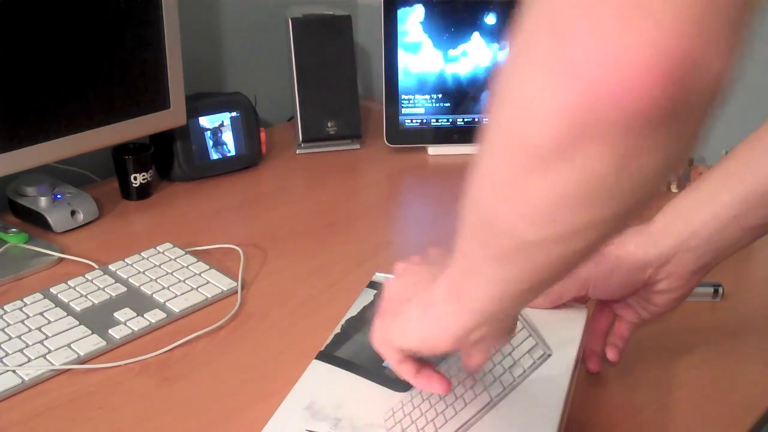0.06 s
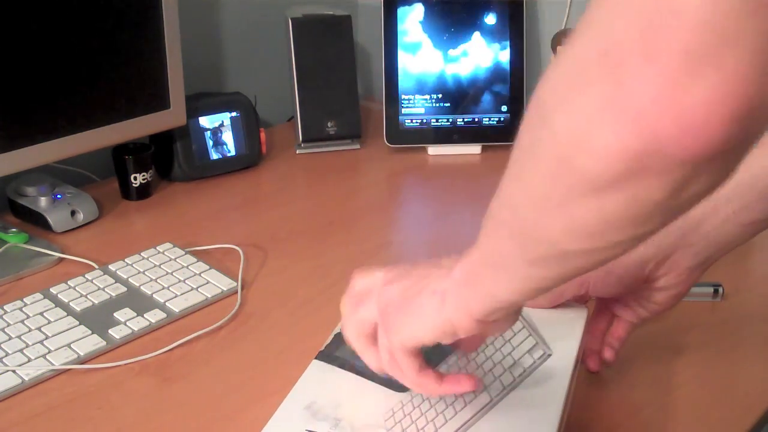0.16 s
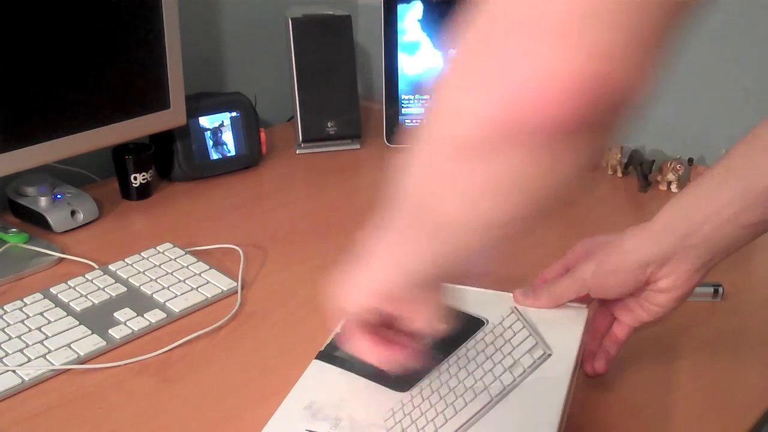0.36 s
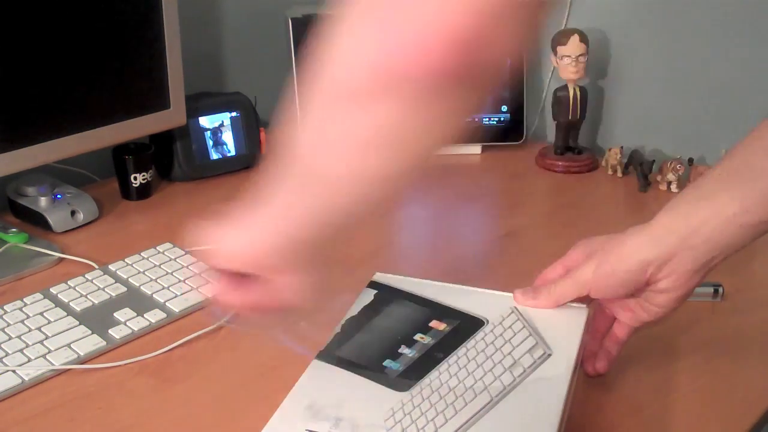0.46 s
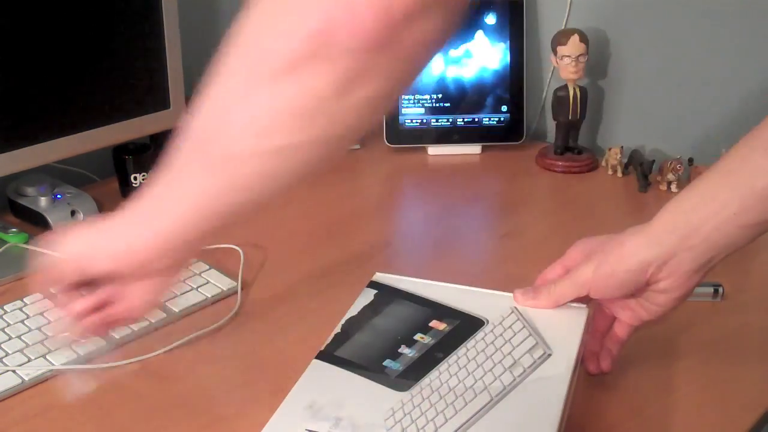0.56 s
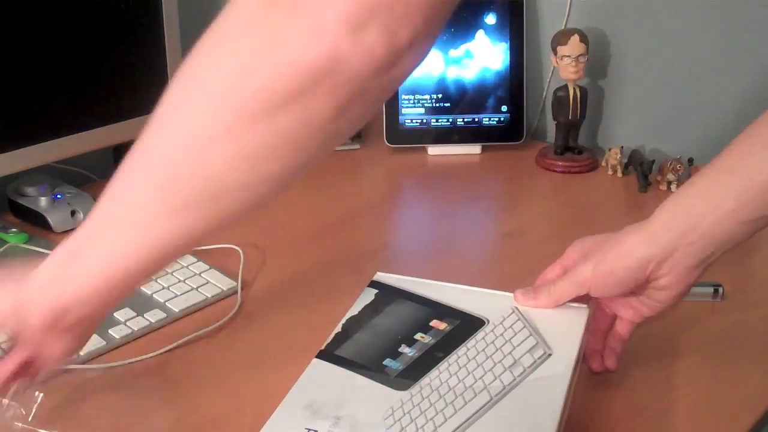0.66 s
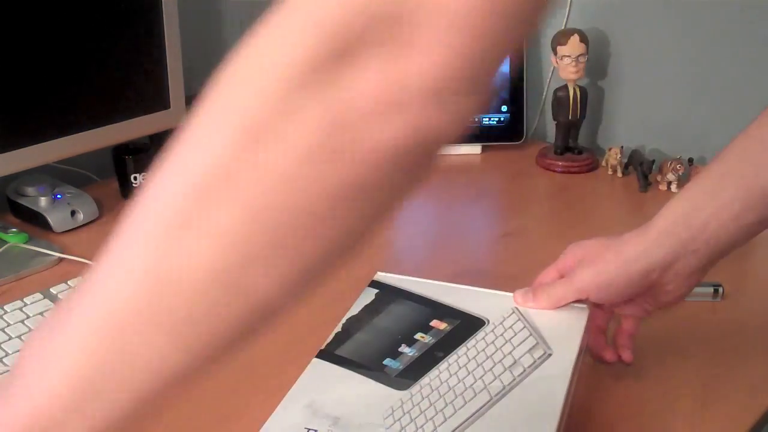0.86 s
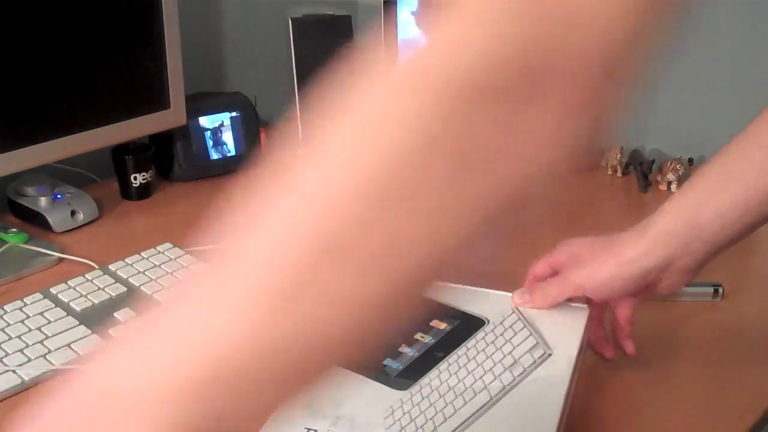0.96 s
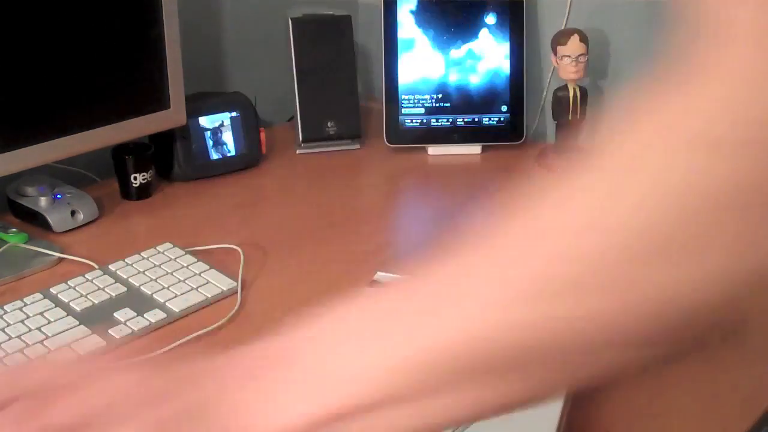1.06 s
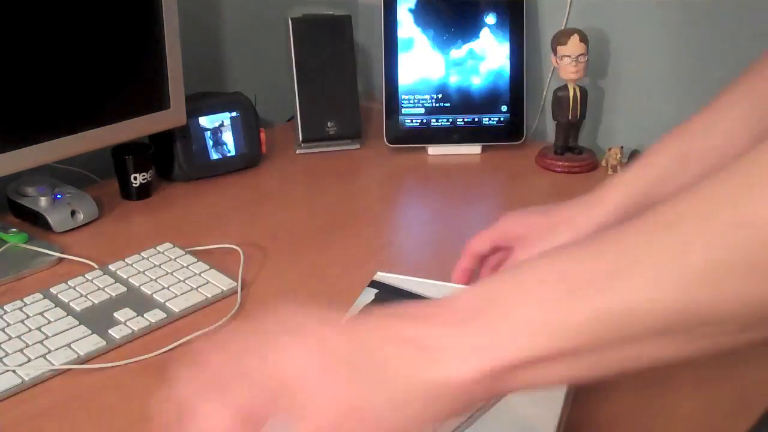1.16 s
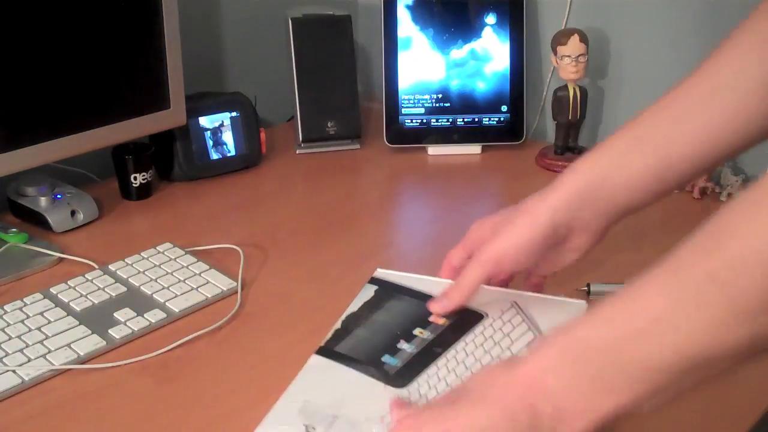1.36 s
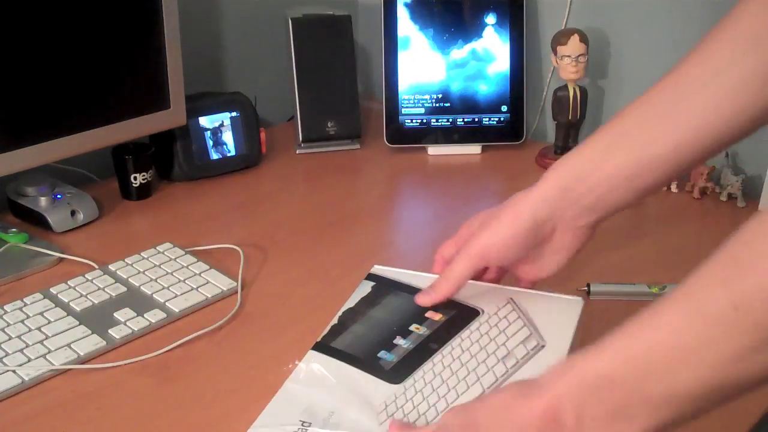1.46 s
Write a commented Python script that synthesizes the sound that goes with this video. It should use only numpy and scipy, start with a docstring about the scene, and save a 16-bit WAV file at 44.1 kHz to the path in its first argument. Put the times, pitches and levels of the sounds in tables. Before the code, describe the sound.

Plastic shrink-wrap is ripped off a cardboard box with pops, crackles and a quick zip

```python
"""Shrink-wrap is pulled off a cardboard box on a desk in a small, quiet room.
First the loose film crinkles (tiny random cracks), the box bumps softly, and the film gives way with a pop.
It rips (dense cracks), squeaks (stick and slip) and zips with a mostly falling rasp (more regular cracks).
Then it peels off in jerky ticks that ring the sheet. At the end a hand taps and slaps the box,
thuds sound in the desk, the box bumps once more, and the palm slides over it (noisy grains)."""
import sys
import numpy as np
from scipy import signal
from scipy.fft import rfft, irfft
from scipy.io import wavfile
from scipy.ndimage import uniform_filter1d

SR = 44100
rng = np.random.default_rng(int(sys.argv[2]) if len(sys.argv) > 2 else 0)


def write(x):
    x = np.atleast_2d(x).T
    wavfile.write(sys.argv[1], SR, np.round(np.clip(x, -1, 1) * 32767).astype(np.int16))


N = 66150
TIME = np.arange(N) / SR  # s

# Levels in the tables are relative: colouring and mixing come on top.
# Background sound of the room, its spectrum [f/Hz, level/dB]
FLOOR_COLOUR = [(20, -4), (60, -0.5), (95, -13), (160, 0.5), (280, 3), (420, 2), (640, -0.5), (1100, -7.5),
                (2000, -8.5), (3000, -8), (6000, -14), (10000, -21.5), (12000, -26), (13500, -35)]
# How strong the left-right difference of scattered sound is [f/Hz, level/dB]
WIDTH = [(40, -4), (150, -14), (300, -19), (700, -11), (1500, -7.5), (3000, -6.5), (5000, -2.5), (8000, 0),
         (13000, -7)]
# Rustle of loose film [t/s, level/dB]
RUSTLE = [(0, -51), (.028, -52), (.045, -38), (.07, -38), (.098, -38.5), (.13, -54.5), (.15, -44),
          (.175, -63), (.245, -45.5), (.26, -34.5), (.285, -38), (.32, -53.5), (.72, -45), (.91, -39.5),
          (.95, -41.5), (.995, -41.5), (1.04, -54.5), (1.1, -86)]
# Single sharp cracks in the crinkling film [t/s, level/dB]
CRINKLES = [(.0405, -25), (.0454, -14.5), (.0542, -16.5), (.0568, -14.5), (.0595, -22), (.0658, -13),
            (.0683, -18.5), (.0752, -11), (.0906, -21), (.2573, -14), (.3068, -26), (.336, -10.5),
            (.3616, -7), (.4766, -4.5), (.9367, -16), (.9423, -12), (.9461, -14.5), (.9585, -15)]
# Spectrum of rustle and crinkles [f/Hz, level/dB]
RUSTLE_COLOUR = [(60, -21.5), (500, -7.5), (1000, -2.5), (2000, -2.5), (3400, 3.5), (5000, 0), (7000, -0.5),
                 (10000, -2), (13500, -19)]
# Soft bumps of the box [t/s, level/dB]
BUMPS = [(.147, -15), (.228, -14), (1.365, -17)]
# Spectrum of the bumps [f/Hz, level/dB]
BUMP_COLOUR = [(25, -31), (62, -5), (90, -15.5), (125, 3.5), (200, -9.5), (300, 3), (600, -18), (3000, -34),
               (12000, -75)]
# The film lets go and the box knocks [t/s, crack level/dB, ring level/dB]
POPS = [(.2158, 0, -30), (.2179, -2.5, -29), (.2322, -20, -24.5), (.2412, -21, -24.5), (.2545, -22, -31),
        (.3635, -14, -35), (.371, -14, -35), (.471, -16, -36)]
# Spectrum of the pops [f/Hz, level/dB]
POP_COLOUR = [(30, -39), (140, -18), (280, -1), (560, 8), (830, -4.5), (1400, 7), (1900, -1), (2350, 4),
              (2900, -6.5), (4000, -6), (6500, -15.5), (10000, -17.5), (13500, -44)]
# Ringing tones of the box [f/Hz, level/dB, time to fade by 60 dB/s]
BOX_MODES = [(296, -18, 0.078), (444, -7.5, 0.095), (484.5, -7.5, 0.085), (623.6, -14, 0.18),
             (1028, -15, 0.08), (1140, -15, .08), (1275, -18, 0.1), (1654, -18, 0.075), (1907, -19, 0.1),
             (2430, -21, 0.06)]
# The running rip [t/s, level/dB]
RIP = [(.33, -45), (.345, -35), (.37, -31.5), (.395, -32.5), (.443, -25), (.456, -33.5), (.473, -27),
       (.495, -35), (.53, -29.5), (.565, -30), (.58, -41.5), (.65, -38.5), (.7, -64)]
# Spectrum of the rip [f/Hz, level/dB]
RIP_COLOUR = [(60, -26), (300, -18), (550, -0.5), (900, -5), (1170, -0.5), (1450, -3.5), (2400, -2),
              (3700, 2), (5500, -2.5), (9000, -2.5), (11000, -6), (13500, -19)]
# Squeak of the dragging film [t/s, rate/slips per s, level/dB]
SQUEAK = [(0.404, 1110, -65), (0.428, 1240, -32.5), (.455, 1200, -42), (0.477, 1180, -34.5),
          (0.512, 1090, -48), (0.526, 1170, -33)]
# Spectrum of the squeak [f/Hz, level/dB]
SQUEAK_COLOUR = [(100, -48), (700, -26), (1000, 8), (1350, -5), (2200, -14), (10000, -22)]
# The rip at its fastest [t/s, rate/fractures per s, level/dB]
ZIP = [(.5, 5660, -32), (.512, 5500, -28), (.521, 5500, -23), (.529, 4500, -29.5), (.544, 4000, -26.5),
       (.552, 3050, -31.5), (0.565, 2280, -31), (0.577, 2700, -37.5)]
# Spectrum of the zip [f/Hz, level/dB]
ZIP_COLOUR = [(500, -24), (2000, 3), (3000, 5.5), (5500, 3.5), (9000, 1), (13000, -17.5)]
# Ringing tones of the stretched strip [f/Hz, level/dB]
STRIP_MODES = [(2840, -2), (3370, -6), (4035, 0), (4335, -1), (4820, 0), (5155, 0), (5765, 0)]
# Lesser slips between the jerks of the peeling film [t/s, level/dB, rate/slips per s]
PEEL = [(.57, -40, 600), (.595, -35, 450), (.625, -35.5, 350), (.66, -42, 300), (.71, -57, 300),
        (.765, -45, 230), (.773, -34, 235), (.828, -32.5, 245), (.843, -37, 220), (.86, -46, 220),
        (.91, -55, 170), (.94, -62, 150)]
# Spectrum of the lesser slips [f/Hz, level/dB]
SLIP_COLOUR = [(100, -42), (280, -22), (480, -7), (900, 4), (1600, 3.5), (2250, 2), (2800, -6.5),
               (4500, -6.5), (9500, -8), (13000, -28)]
# Strongest jerks of the peeling film [t/s, level/dB]
JERKS = [(.594, -13), (.621, -12), (.665, -15), (.6672, -14), (.691, -8.5), (.72, -8.5), (.722, -14),
         (.7332, -14), (.7402, -10.5), (.7463, -11), (.7553, -8.5), (.762, -8.5), (.7687, -8.5),
         (.782, -12), (.796, -11), (.8155, -12), (.8237, -13), (.8399, -10), (.8459, -11), (.8541, -11),
         (.86, -11), (.8666, -9.5), (.8745, -12), (.887, -12), (.8931, -11), (.9012, -10), (.9071, -14),
         (.9138, -9.5)]
# Spectrum of the jerks [f/Hz, level/dB]
JERK_COLOUR = [(70, -48), (230, -45), (450, -5.5), (620, -5.5), (780, -11.5), (950, 0), (1600, -3),
               (2200, -3.5), (2700, -6.5), (4500, -7.5), (6500, -11), (9500, -6.5), (11000, -16),
               (13000, -26)]
# Ringing tones of the taut sheet [f/Hz, level/dB, time to fade by 60 dB/s]
SHEET_MODES = [(615, -48, 0.1), (895, -39, 0.1), (1030, -47, 0.09), (2074, -43, 0.04)]
# Faint finger taps as the grip shifts [t/s, level/dB]
TAPS = [(1.127, -30), (1.181, -32), (1.224, -32)]
# Blows of the hand [t/s, slap level/dB, thud level/dB]
BLOWS = [(1.3093, -29, -57), (1.3178, -21.5, -42), (1.3325, -21, -55), (1.3352, -10, -42),
         (1.3415, -16, -50)]
# Spectrum of taps and slaps [f/Hz, level/dB]
SLAP_COLOUR = [(40, -16), (90, -28), (170, 3.5), (450, 12), (800, -2.5), (1650, -1), (1880, 2.5),
               (2250, -1), (2800, -6.5), (3500, -6.5), (4300, -7.5), (9000, -9.5), (13500, -30)]
# Ringing tones of the lid's edge under the hardest blow [f/Hz, level/dB, time to fade by 60 dB/s]
EDGE_MODES = [(2200, -28, .026), (3450, -29, .02), (5300, -30, .014)]
# Ringing tones of the desk under the box [f/Hz, level/dB, time to fade by 60 dB/s]
DESK_MODES = [(136, 0, .38), (205, -6, .1), (269, -1, .24), (339, -4, .17), (455, -4, .14), (700, -12, .1)]
# The palm slides on the box [t/s, level/dB]
SLIDE = [(1.31, -84), (1.345, -54), (1.39, -45), (1.43, -42.5), (1.45, -45.5), (1.475, -45.5), (1.5, -47.5)]
# Spectrum of the slide [f/Hz, level/dB]
SLIDE_COLOUR = [(200, -5.5), (800, -6.5), (1800, -9), (4200, 1.5), (6000, 0), (9000, 3), (13500, -11.5)]

FLOOR_DB = -55
SCATTER_T60_S, ROOM_T60_S = 0.1, 0.28  # time to fade by 60 dB: desk echoes, room echoes
PAN_DB, LEFT_LEAD_S = 0.6, .00003  # left is raised and right lowered by PAN_DB; right comes later
BEND_HZ = 2720  # bending waves lag below this
CUTOFF_HZ = 13900
STRIP_DB, STRIP_T60_S = -34, .04


def amp(db):
    """Turn decibels into gain."""
    return 10 ** (np.asarray(db) / 20)


def unit(x):
    """Scale to an average strength (rms) of 1."""
    return x / np.sqrt(np.mean(x ** 2) + 1e-20)


def level(rows, column=1):
    """Gain that follows a dB curve over time, practically silent outside it."""
    rows = np.array(rows)
    return amp(np.interp(TIME, rows[:, 0], rows[:, column], left=-140, right=-140))


def convolve(x, kernel):
    """Let every sample of each channel set off a copy of the kernel."""
    return np.apply_along_axis(signal.fftconvolve, -1, x, kernel)[..., :N]


def response(points, size=4096):
    """Short echo pattern with the given spectrum that never starts before its cause."""
    hz, db = np.transpose(points)
    grid = np.maximum(np.arange(size // 2 + 1) * SR / size, 1)
    gain = amp(np.interp(np.log(grid), np.log(hz), db))
    # Folding the cepstrum packs the energy as early as possible (minimum phase)
    cepstrum = irfft(np.log(gain))
    cepstrum[1:size // 2] *= 2
    cepstrum[size // 2 + 1:] = 0
    return irfft(np.exp(rfft(cepstrum)))


def colour(x, points):
    """Give clicks or noise a spectrum; the filter itself has unit energy."""
    shape = response(points)
    return convolve(x, shape / np.linalg.norm(shape))


def clicks(rows, column=1):
    """One click for each row of a table."""
    rows, out = np.array(rows), np.zeros(N)
    places = np.clip((rows[:, 0] * SR).astype(int), 0, N - 1)
    out[places] = amp(rows[:, column])
    return out


def ring(x, modes):
    """Clicks strike an object, whose tones ring and die away."""
    tones = 0
    for hz, db, t60 in modes:
        tones = tones + amp(db - 60 * TIME / t60) * np.cos(2 * np.pi * hz * TIME)
    return convolve(x, tones)


def grains(per_s, spread_db):
    """Tiny cracks of random size at random moments; rms 1."""
    sizes = amp(spread_db * np.minimum(rng.exponential(1, N), 4))
    signs = rng.choice([-1, 1], N)
    happens = rng.random(N) < per_s / SR
    return unit(sizes * signs * happens)


def slips(per_s, jitter, spread_db):
    """Stick and slip: a click each time the pull has taken up an uneven length of film; rms near 1."""
    lengths = np.exp(jitter * rng.standard_normal(N))
    sizes = amp(rng.standard_normal(N) * spread_db)
    pulled = np.cumsum(per_s) / SR
    done = np.searchsorted(np.cumsum(lengths), pulled)
    return np.diff(done, prepend=0) * unit(sizes) * np.sqrt(SR / per_s)


def stereo_noise():
    """Noise that is mostly alike at both microphones in the bass and unlike in the treble."""
    mid, side = rng.standard_normal((2, N))
    side = convolve(side, response(WIDTH))
    return np.array([mid + side, mid - side])


def fade(t60):
    """A dying curve of unit energy."""
    shape = amp(-60 * TIME / t60)
    return shape / np.linalg.norm(shape)


def direct(x):
    """The straight path: slightly louder and earlier on the left."""
    right = np.interp(TIME - LEFT_LEAD_S, TIME, x)
    return np.array([x * amp(PAN_DB), right * amp(-PAN_DB)])


def place(x, room_db):
    """A source that stays put: direct sound and the room's echoes as fading noise."""
    tails = stereo_noise() * fade(ROOM_T60_S)
    echoes = np.array([convolve(x, tail) for tail in tails])
    return direct(x) + amp(room_db) * echoes


def scatter(cracks, direct_db, burst_db, desk_db, room_db, burst_t60_s=0.0021):
    """Each crack comes from a new spot, with its own splintering burst, desk echoes and room tail."""
    parts = [(burst_db, burst_t60_s), (desk_db, SCATTER_T60_S), (room_db, ROOM_T60_S)]
    tail_power = sum((amp(db) * fade(t60)) ** 2 for db, t60 in parts)
    envelope = np.sqrt(np.abs(convolve(cracks ** 2, tail_power)))
    return amp(direct_db) * direct(cracks) + envelope * stereo_noise()


def disperse(x, spread_s):
    """Bending waves: the treble arrives first, the bass a little later."""
    hz = np.arange(N + 1) * SR / (2 * N)
    delay = spread_s / (1 + hz / BEND_HZ)
    phase = 2 * np.pi * np.cumsum(delay) * hz[1]  # phase is delay added up over frequency
    return irfft(rfft(x, 2 * N) * np.exp(-1j * phase))[..., :N]


def room_floor():
    """The quiet room: steady noise, strongest in the bass and low middle."""
    return amp(FLOOR_DB) * unit(colour(stereo_noise(), FLOOR_COLOUR))


def crinkle():
    """Loose film: a haze of small creases with a few sharp ones."""
    creases = level(RUSTLE) * grains(per_s=2000, spread_db=0.5) + clicks(CRINKLES)
    spread = scatter(creases, direct_db=-5, burst_db=-6.5, desk_db=-9, room_db=-16.5)
    return colour(disperse(spread, spread_s=0.000476), RUSTLE_COLOUR)


def bumps():
    """The box shifts on the desk with soft, low bumps."""
    knocks = scatter(clicks(BUMPS), direct_db=-6.5, burst_db=-6, desk_db=-23, room_db=-3)
    return colour(knocks, BUMP_COLOUR)


def pop():
    """The film bursts in short cracks, and the box rattles in its own ringing tones."""
    cracks = -clicks(POPS)
    burst = scatter(cracks, direct_db=-4.5, burst_db=-5, desk_db=-2.5, room_db=-2, burst_t60_s=0.0082)
    rattle = place(ring(clicks(POPS, 2), BOX_MODES), room_db=-20)
    return colour(burst, POP_COLOUR) - rattle


def rip():
    """Dense fractures as the tear runs across the box."""
    fractures = level(RIP) * grains(per_s=5000, spread_db=2)
    tear = scatter(fractures, direct_db=-4, burst_db=-21.5, desk_db=-3.5, room_db=-6.5)
    return colour(tear, RIP_COLOUR)


def squeak():
    """The stretched film drags over the cardboard, sticking and slipping in a short, rough squeak."""
    s, per_s, _ = np.transpose(SQUEAK)
    drag = slips(np.interp(TIME, s, per_s), jitter=0.063, spread_db=0)
    return place(level(SQUEAK, 2) * unit(colour(drag, SQUEAK_COLOUR)), room_db=-13)


def zip_up():
    """At full speed the fractures line up into a rough, mostly falling rasp that rings the stretched strip."""
    s, per_s, _ = np.transpose(ZIP)
    fractures = slips(np.interp(TIME, s, per_s), jitter=0.24, spread_db=0)
    fractures = unit(fractures - uniform_filter1d(fractures, size=31))  # take out the slow part
    fractures = level(ZIP, 2) * fractures
    modes = [(hz, STRIP_DB + db, STRIP_T60_S) for hz, db in STRIP_MODES]
    ringing = place(ring(fractures, modes), room_db=-9)
    rasp = scatter(fractures, direct_db=2.5, burst_db=-4.5, desk_db=-17, room_db=-16)
    return colour(rasp, ZIP_COLOUR) + ringing


def peel():
    """The taut film tears on in sharp jerks and a stutter of duller slips, which set the sheet ringing."""
    s, _, per_s = np.transpose(PEEL)
    jerks = clicks(JERKS)
    stutter = level(PEEL) * slips(np.interp(TIME, s, per_s), jitter=.13, spread_db=2)
    spread = dict(direct_db=-1.5, burst_db=-7, desk_db=-8, room_db=-13, burst_t60_s=.01)
    sharp_ticks = colour(scatter(jerks, **spread), JERK_COLOUR)
    dull_ticks = colour(scatter(stutter, **spread), SLIP_COLOUR)
    ringing = place(ring(jerks + .5 * stutter, SHEET_MODES), room_db=-1)
    return disperse(sharp_ticks + dull_ticks, spread_s=0.000784) + ringing


def hand():
    """Taps and slaps on the box, a crack from its edge, thuds in the desk, and the sliding palm."""
    touches = clicks(BLOWS) + clicks(TAPS)
    slaps = scatter(touches, direct_db=-2, burst_db=-2.5, desk_db=-6, room_db=-6, burst_t60_s=.018)
    slaps = disperse(colour(slaps, SLAP_COLOUR), spread_s=0.00143)
    hardest = max(BLOWS, key=lambda blow: blow[1])
    crack = place(ring(clicks([hardest]), EDGE_MODES), room_db=-12)
    thuds = place(ring(clicks(BLOWS, 2), DESK_MODES), room_db=-18)
    rubbing = level(SLIDE) * grains(per_s=5100, spread_db=-0.5) * stereo_noise()
    return slaps + crack + thuds + colour(rubbing, SLIDE_COLOUR)


def scene():
    """Film, box and hand over the quiet room."""
    film = crinkle() + pop() + rip() + squeak() + zip_up() + peel()
    return room_floor() + film + bumps() + hand()


def record(dry):
    """The top of the treble is cut steeply."""
    low_pass = signal.ellip(10, .3, 80, CUTOFF_HZ, fs=SR, output="sos")  # .3 dB ripple, 80 dB cut
    return signal.sosfilt(low_pass, dry)


dry = scene()
out = record(dry)
write(out)
```